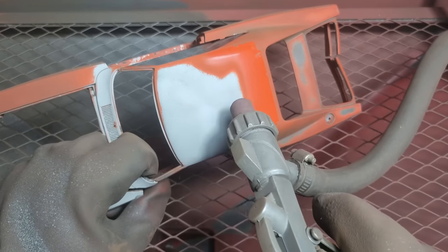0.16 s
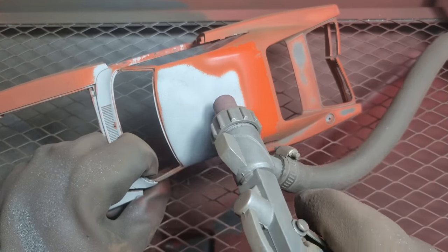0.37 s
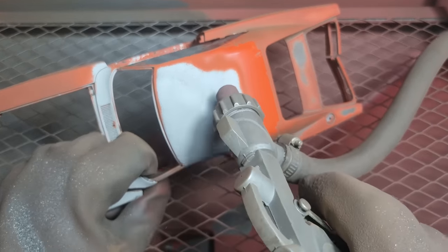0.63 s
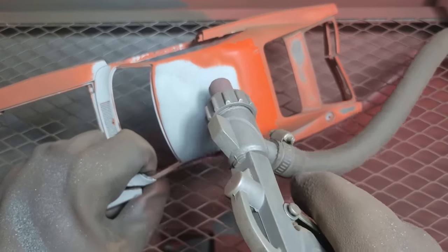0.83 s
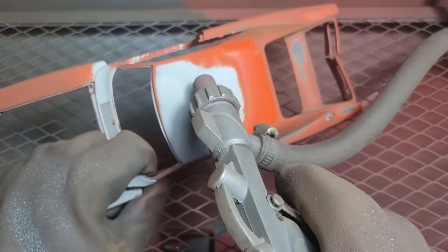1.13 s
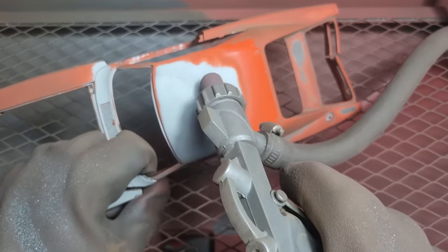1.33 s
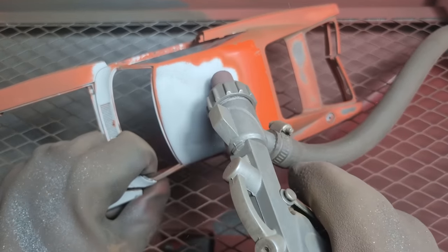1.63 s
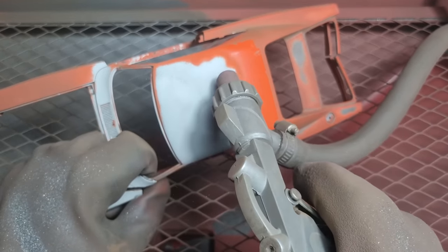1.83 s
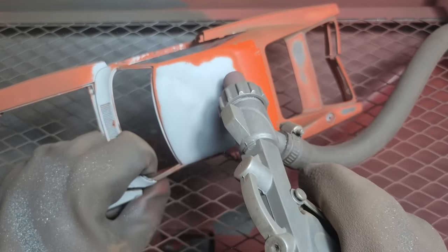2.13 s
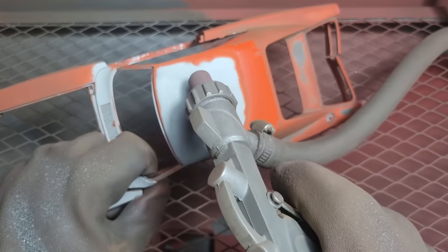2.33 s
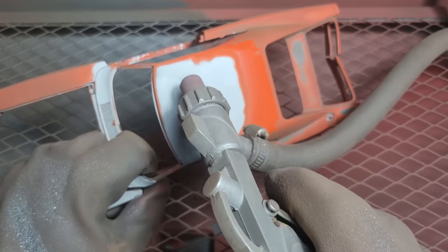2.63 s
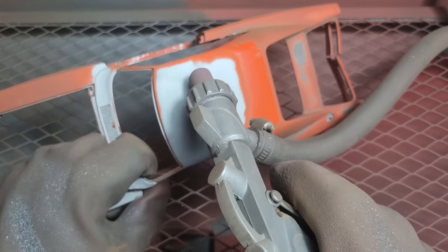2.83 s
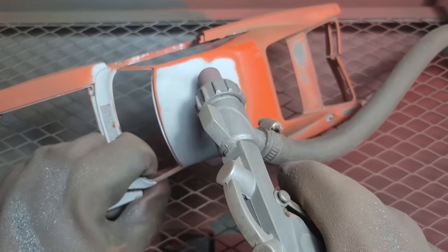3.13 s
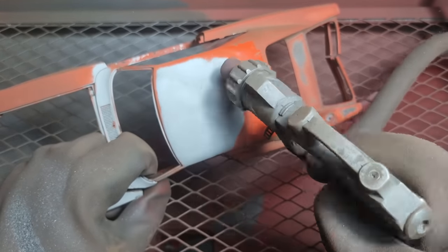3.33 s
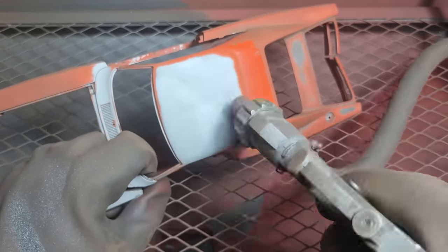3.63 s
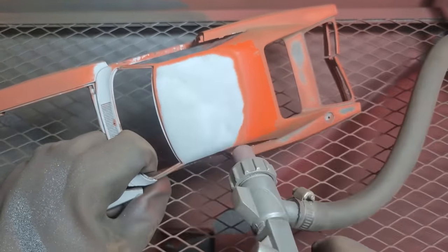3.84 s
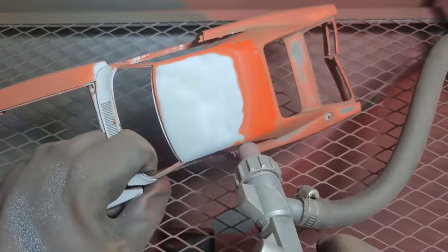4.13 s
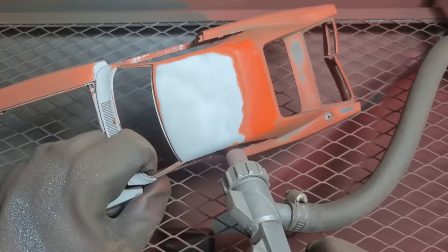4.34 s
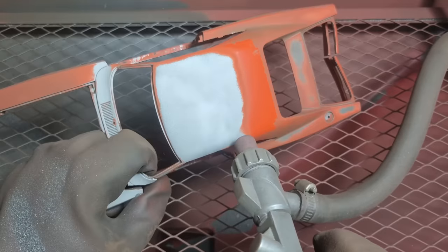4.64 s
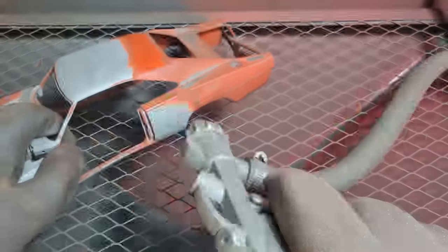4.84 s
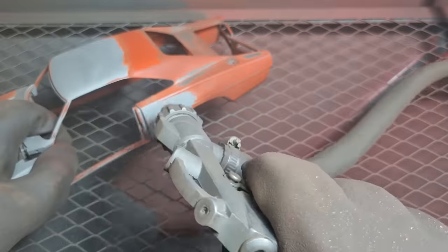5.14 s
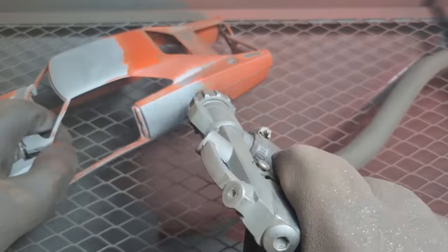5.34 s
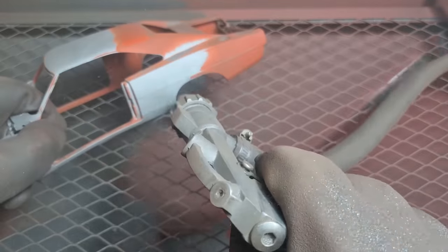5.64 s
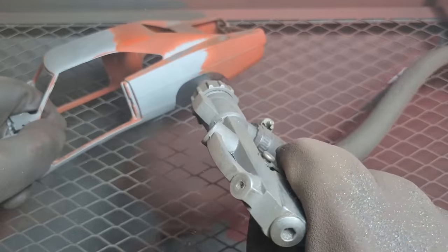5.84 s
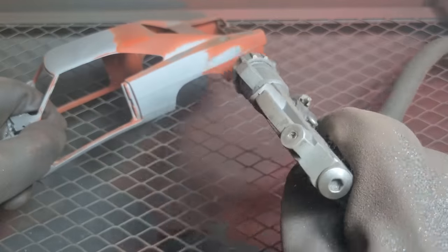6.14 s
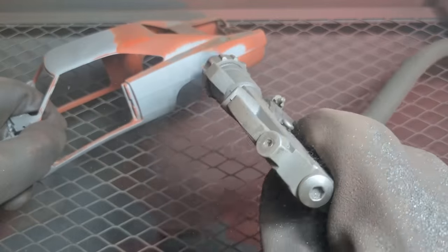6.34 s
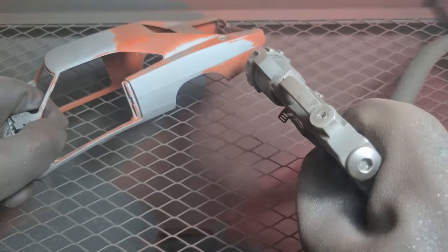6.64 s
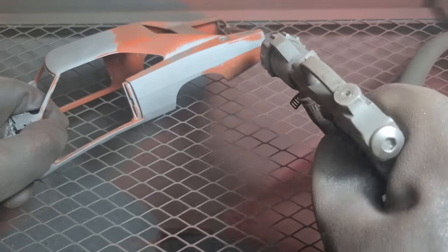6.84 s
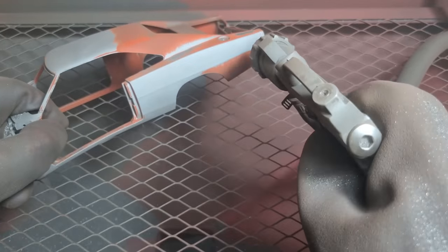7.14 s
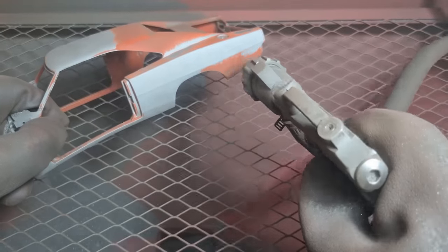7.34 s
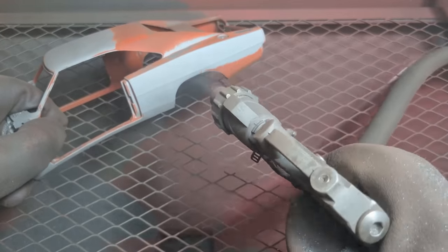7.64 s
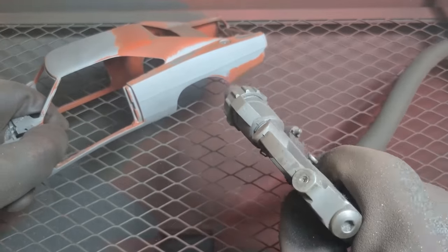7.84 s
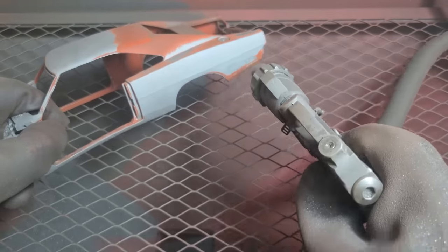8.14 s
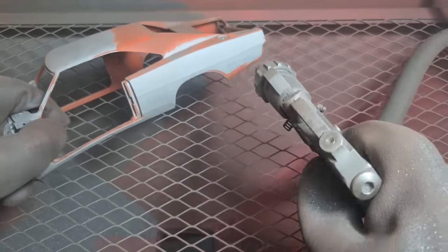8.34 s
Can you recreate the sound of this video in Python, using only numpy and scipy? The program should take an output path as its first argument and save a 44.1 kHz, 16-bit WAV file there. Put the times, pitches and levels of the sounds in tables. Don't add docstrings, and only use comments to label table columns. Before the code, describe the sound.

Steady gritty hiss of a blasting gun on a small metal casting in a steel cabinet, over machine hum; it turns fuller and choppier halfway.

```python
import sys
import numpy as np
from scipy import signal
from scipy.fft import rfft, irfft
from scipy.io import wavfile
from scipy.ndimage import uniform_filter1d

SR = 44100
rng = np.random.default_rng(int(sys.argv[2]) if len(sys.argv) > 2 else 0)


def amplitude_ratio(level_db):
    exponent = np.asarray(level_db, float) / 20
    return 10 ** exponent


def file_out(sig):
    cols = np.atleast_2d(sig).T
    lim = np.clip(cols, -1, 1)
    pcm = np.round(lim * 32767).astype(np.int16)
    wavfile.write(sys.argv[1], SR, pcm)


N = 373968
T, HOP, SIZE = np.arange(N) / SR, 256, 1024

CHANGES = (4.848, 8.252)
# compressor in dB, airflow wash in dB, duct ring in dB.
MACHINES = [
    (-42, -46, -52.5),
    (-98, -46.5, -43.5),
    (-38.5, -43, -49),
]

# roar, splash on the work, jet and grit fizz, all in dB.
BLAST_LAYERS = [
    (-55.5, -50, -50.5, -54),
    (-52, -49, -48, -49.5),
    (-52.5, -47.5, -49, -51),
]
AIM_DRIFT = (-0.43, 0.29, -0.51, -0.55)
# frequency in Hz, density in dB per Hz.
HISS_SPECTRUM = [(700, -27), (1150, -8), (1500, -6), (2100, -4.5), (2700, -5.5), (3900, -5), (5200, -5),
                 (6500, -4.5), (7900, -7.5), (9000, -13.5), (10500, -15.5), (12000, -13), (15000, -12.5),
                 (15700, -11)]
# frequency in Hz, width in Hz, level in dB.
PANELS_EARLY = [(1610, 49, -4), (2010, 200, -4), (2840, 37, -4), (3360, 82, -3), (3750, 29, 0),
                (4030, 54, -1), (4660, 45, 0), (5310, 140, -1), (6510, 110, 0), (7120, 140, -3),
                (7750, 70, -3), (8140, 120, -6)]
# frequency in Hz, width in Hz, level in dB.
PANELS_LATE = [(2010, 110, -3), (2890, 30, -3), (3820, 44, 0), (4290, 48, -2), (4740, 97, -3),
               (5200, 46, -1), (6540, 66, -1), (6780, 54, -3), (7130, 110, -5), (7640, 210, -5),
               (8170, 38, -8), (8790, 42, -10)]
# start in seconds, end in seconds, frequency in Hz, width in Hz, level in dB.
EDGE_WHISTLES = [(1.0, 1.6, 4655, 20, 8), (1.7, 3.4, 4655, 20, 7), (3.6, 4.8, 4030, 40, 0),
                 (5.1, 5.2, 6700, 90, 2), (5.35, 5.5, 7800, 80, 1), (5.97, 6.05, 6600, 90, 2),
                 (6.28, 6.48, 7750, 80, 1), (7.75, 7.95, 4790, 40, 3), (1.35, 2.3, 6500, 90, 2),
                 (7.55, 7.79, 5200, 50, 2), (7.55, 7.79, 3200, 60, 1), (7.9, 8.45, 2900, 30, 4),
                 (7.95, 8.48, 4000, 250, 0)]
# start in seconds, end in seconds, splash in dB, share of it that jet and fizz follow.
JET_SURGES = [
    (4.358, 4.52, 1, 1.3),
    (4.549, 4.8, -1.5, 0.37),
    (4.844, 4.912, -6, 1.5),
    (5.58, 5.72, 1, -0.068),
    (5.814, 5.95, 2.5, -0.29),
    (7.55, 7.792, 4, -.15),
]
# centre in seconds, depth in dB, half width in seconds.
GRIT_GAPS = [
    (4.99, 4, .02),
    (5.215, 7, .012),
    (5.345, 7.5, .013),
    (5.502, 7, .008),
    (5.72, 8.5, .014),
    (5.935, 8, .012),
    (6.118, 7, .01),
    (6.31, 4, .015),
    (6.475, 3, .009),
]

# time in seconds, shaft in Hz, level in dB, left minus right in dB, left's lead in radians.
SHAFT_TRACK = [(0, 534.4, -36.5, -2, 1.2), (.42, 536, -37, 0, 1.26), (2.1, 535.4, -37.5, -.5, 1.4),
               (2.73, 540, -38, -2.5, 1.5), (2.83, 538, -37, 5, .65), (3.8, 534.4, -38, 2.5, 0.64),
               (4.5, 537, -38.5, 5, .52), (4.843, 534, -37.5, 3, 0.31), (4.849, 544.6, -27, 8.5, .55),
               (5.5, 544, -27.5, 10, .68), (5.63, 547, -27, 5, 0.025), (6.6, 546.6, -27, 6.8, -0.22),
               (7.52, 545, -27, 9.5, -0.092), (7.7, 546, -29.5, 4, 0), (7.83, 545.1, -27.5, 8, 0.064),
               (8.238, 545.1, -27.5, 10, .1), (8.262, 538, -37, 4, 0.78), (8.29, 539.3, -32.3, 5.5, 0.85)]
# start in seconds, length in seconds, level in dB.
BLADE_FLARES = [(0, .15, -50), (1.55, 0.71, -53), (4.86, .015, -41), (4.95, .12, -58), (5.602, 0.25, -44.5),
                (5.9, .65, -52), (6.65, .3, -59), (8.03, .06, -53), (8.17, .06, -47), (7.15, .35, -58),
                (8.3, .2, -57)]
# frequency in Hz, density in dB per Hz.
AIR_SPECTRUM = [(20, -26), (54, -9.5), (114, -20.5), (150, -22), (216, -11), (330, -6.5), (420, -7.5),
                (520, -7), (670, -8), (900, -10), (1300, -13.5), (1700, -36)]
# frequency in Hz, width in Hz, level in dB.
DUCT_MODES = [(180, 15, -8), (296, 16, 0), (335, 14, -4), (372, 22, 0), (590, 20, -5), (738, 25, -11),
              (845, 20, -10), (1005, 28, -2)]

# frequency in Hz, width in Hz, level in dB.
BODY_MODES = [(75, 5.5, -13.5), (165, 10, -8), (246.3, 14.3, -9), (324, 17.6, -7), (393.8, 14.5, -4.5),
              (494, 23, -21), (620, 22, -32), (724.6, 13.4, -8), (945, 14, -17.5), (1004, 21, -14),
              (1126, 16, -23.5), (1280, 20, -19)]
# frequency in Hz, level in dB.
PIPE_TONES = [
    (247.5, -11.5),
    (398, -7.5),
]

# start in seconds, length in seconds, start pitch in Hz, rise ratio, level in dB.
GLOVE_GROANS = [
    (0.221, .15, 47.7, 1.2, -52.5),
    (1.202, .11, 71.5, 1.07, -54),
    (5.07, .13, 75, 1.34, -52),
    (5.441, .08, 112, 1.1, -58),
    (5.52, 0.15, 115, 1.16, -55.5),
    (5.599, .174, 64.6, 1.41, -46.5),
    (5.87, .1, 105, 1.2, -55.5),
    (6.03, .09, 66, 1.3, -62),
    (6.158, 0.094, 76.5, 1.05, -57),
    (7.02, 0.11, 44.6, 1.4, -57),
]

# frequency in Hz, coherence from 0 to 1.
COHERENCE = [(60, 0.9), (130, 0.82), (290, 0.95), (640, 0.18), (1410, 0.2), (3100, 0.75), (6820, 0.48),
             (15000, 0.65)]
# frequency in Hz, left's lead in radians.
SIDE_PHASE = [(20, 0), (400, .25), (860, 2.4), (1400, 1.5), (2100, -.2), (15000, 0)]
# frequency in Hz, left minus right in dB.
SIDE_BALANCE = [(60, .3), (110, 0.0), (200, -2.5), (380, 2.0), (700, 1.0), (1290, -1.0), (2380, 2.5),
                (4400, 7), (8120, 2.5), (15000, -0.5)]


def evened(x):
    return x / np.sqrt(np.mean(abs(x) ** 2) + 1e-20)


def unit(shape):
    return shape / np.sqrt(np.sum(shape ** 2))


def read(points, hz):
    f, value = np.transpose(points)
    return np.interp(np.log(hz + 1), np.log(f + 1), value)


def by_view(table, t):
    return np.transpose(table)[:, np.searchsorted(CHANGES, t)]


def drift(hz, count):
    f = np.geomspace(.2, hz, count)[:, None]
    t = T[::HOP]
    waves = np.sin(2 * np.pi * (f * t + rng.random((count, 1)))) / np.sqrt(f)
    return np.interp(T, t, evened(waves.sum(0)))


def phase_of(hz):
    return 2 * np.pi * np.cumsum(hz) / SR


def resonances(modes, hz):
    return np.sqrt(sum(amplitude_ratio(db) ** 2 / (1 + (2 * (hz - f) / width) ** 2) for f, width, db in modes))


def grid(size):
    return np.fft.rfftfreq(size, 1 / SR)[:, None], np.arange(4 * N // size + 4) * size / 4 / SR


def diffuse_noise(magnitude, size):
    hz = grid(size)[0]
    a, b, c, d = rng.standard_normal((4,) + magnitude.shape)
    same = np.clip(read(COHERENCE, hz), 0, 1)
    left = a + 1j * b
    right = same * left + np.sqrt(1 - same ** 2) * (c + 1j * d)
    right = right * np.exp(-1j * read(SIDE_PHASE, hz))
    lean = amplitude_ratio(read(SIDE_BALANCE, hz) / 2)
    z = np.array([left * lean, right / lean]) * magnitude
    return signal.istft(z, nperseg=size, noverlap=size * 3 // 4)[1][:, :N]


def cabinet(size):
    places, decay_s, direct, diffuse = 9, 0.12, 0.61, 0.51
    out = np.zeros((2, N + size))
    span = N // (places - 1) + 1
    t = np.arange(size) / SR
    for k in range(places):
        at = np.arange(max(k - 1, 0) * span, min((k + 1) * span, N))
        hiss = rng.standard_normal(len(at)) * np.cos(np.pi / 2 * (at / span - k))
        fine = rfft(rng.standard_normal((2, size)) * amplitude_ratio(-60 * t / decay_s))
        broad = np.sqrt(uniform_filter1d(abs(fine) ** 2, size=28))
        echoes = irfft(fine / broad, size)
        echoes[:, :2] = direct * np.array([1, -.5])
        out[:, at[0]:at[-1] + size] += signal.oaconvolve(hiss[None], echoes, axes=1)
    return out[:, :N] + diffuse * rng.standard_normal((2, N))


def blast():
    hz, t, z = signal.stft(cabinet(size=4096), SR, nperseg=SIZE, noverlap=SIZE - HOP)
    hz = hz[:, None]
    turned_s = np.where(t < CHANGES[1], np.maximum(t - CHANGES[0], 0), 0)
    layers_db = []
    for layer_db, slope in zip(by_view(BLAST_LAYERS, t), AIM_DRIFT):
        unsteady_hand_db = .35 * np.interp(t, T, drift(6, count=20))
        layer_db = layer_db + slope * turned_s + unsteady_hand_db
        layers_db.append(layer_db - layer_db.mean())
    layers_db = np.array(layers_db)
    for start, end, db, share in JET_SURGES:
        layers_db += np.outer([0, 1, share, share], db * (t > start) * (t < end))

    knots = np.log([2200, 2750, 5250, 5700, 8300, 9500])
    weights = [np.interp(np.log(hz + 1), knots, w) for w in np.eye(4)[[0, 1, 1, 2, 2, 3]].T]
    level_db = sum(w * layer_db for w, layer_db in zip(weights, layers_db))
    gap_db = 0
    for s, db, half in GRIT_GAPS:
        half = half * np.where(t > s, 1.6, .8)
        gap_db = gap_db + db * np.exp(-((t - s) / half) ** 2)
    level_db = level_db - gap_db * np.interp(hz, [2000, 7000], [.1, .85])
    gust = evened(uniform_filter1d(rng.standard_normal(len(t)), 6))

    ring = np.where(t < 4.85, resonances(PANELS_EARLY, hz), resonances(PANELS_LATE, hz))
    for start, end, f, width, db in EDGE_WHISTLES:
        ring = np.hypot(ring, resonances([(f, width, db)], hz) * (t > start) * (t < end))
    shape = np.hypot(amplitude_ratio(read(HISS_SPECTRUM, hz)), amplitude_ratio(-1.5) * ring) * (hz > 900)
    lean = amplitude_ratio(read(SIDE_BALANCE, hz) * np.array([.5, -.5])[:, None, None])
    z = z * shape * lean * amplitude_ratio(level_db + 0.31 * gust)
    return amplitude_ratio(-40.5) * evened(signal.istft(z, nperseg=SIZE, noverlap=SIZE - HOP)[1][:, :N])


def extractor():
    blades, blur_hz, resting_db, flare_edge_s = 7, 38, -62, 0.045
    s, *columns = np.transpose(SHAFT_TRACK)
    hz, db, pan_db, lead = [np.interp(T, s, c) for c in columns]
    turn = phase_of(hz)
    pair = np.array([amplitude_ratio(pan_db / 2) * np.exp(1j * lead), amplitude_ratio(-pan_db / 2)])
    pair /= abs(pair.mean(0))
    flutter = amplitude_ratio(.3 * drift(14, count=24))
    shaft = np.sqrt(2) * amplitude_ratio(db) * flutter * (pair * np.exp(1j * turn)).real

    r = np.exp(-np.pi * blur_hz / SR)
    white = rng.standard_normal(N) + 1j * rng.standard_normal(N)
    blur = evened(signal.lfilter([1], [1, -2 * r, r * r], white))
    blade_level = amplitude_ratio(resting_db)
    for s, length, db in BLADE_FLARES:
        edge = np.minimum(4 * (T - s), s + length - T) / flare_edge_s
        blade_level = blade_level + amplitude_ratio(db) * np.clip(edge + 1, 0, 1)
    blade = (blur * np.exp(1j * blades * turn)).real * blade_level
    return shaft + blade * amplitude_ratio(np.array([[-9], [0]]))


def airflow():
    hz, t = grid(size=4096)
    _, wash_db, ring_db = by_view(MACHINES, t)
    wash = unit(amplitude_ratio(read(AIR_SPECTRUM, hz))) * amplitude_ratio(wash_db)
    ring = unit(resonances(DUCT_MODES, hz)) * amplitude_ratio(ring_db)
    return diffuse_noise(np.hypot(wash, ring), size=4096) * 0.87


def compressor():
    stroke_hz, casing_hz, casing_db, throb_depth = 11.55, 174.9, -4.5, 0.43
    hz, t = grid(size=8192)
    spot_db = 10.0 * np.exp(-((hz - 1060) / 110) ** 2)
    spot_db = spot_db + 4 * np.exp(-((hz - 400) / 40) ** 2)
    spot_db = spot_db - 4.4 * np.exp(-((hz - 720) / 80) ** 2)
    near = amplitude_ratio((t > 8) * spot_db)
    body = diffuse_noise(unit(resonances(BODY_MODES, hz)) * near, size=8192)

    throb = 1 + throb_depth * np.cos(2 * np.pi * (stroke_hz * T + 0.64))
    phase = phase_of(casing_hz + 0.89 * drift(3.89, count=16))
    drone = amplitude_ratio(casing_db + 0.5 * drift(4.8, count=12)) * throb * np.cos(phase)
    drone = drone * amplitude_ratio(np.array([[-1.5], [1.5]]))
    for f, db in PIPE_TONES:
        pipe_level = amplitude_ratio(db + 2 * drift(4, count=12))
        drone = drone + pipe_level * np.cos(phase_of(f + 3 * drift(8, count=16)))

    level = amplitude_ratio(by_view(MACHINES, T - 0.0072 * (T > 8))[0])
    level = uniform_filter1d(level, size=900) * amplitude_ratio(-0.2 * drift(6, count=16))
    return evened(evened(body) + drone * np.sqrt(2)) * level


def gloves():
    creak_s, creak_db, overtone_db = 5.07, 2, -14
    out = np.zeros(N)
    for s, length, start_hz, rise, db in GLOVE_GROANS:
        turn = phase_of(start_hz * np.linspace(1, rise, int(length * SR)))
        over_db = creak_db if abs(s - creak_s) < .05 else overtone_db
        tone = np.sin(turn) + amplitude_ratio(over_db) * (np.sin(2 * turn) + 0.46 * np.sin(3 * turn))
        out[int(s * SR):][:len(turn)] += 2 * amplitude_ratio(db) * tone * np.hanning(len(turn))
    return out


def first_change():
    fade_s, drop_s, ramp_s, overshoot_s = 4.81, .007, .033, .027
    tail_db, return_db, overshoot_db = -13, -24, 2.3
    back = CHANGES[0] + drop_s / 2
    full = CHANGES[0] + ramp_s
    settling = full + overshoot_s
    at = [fade_s, fade_s + drop_s, CHANGES[0] - drop_s, back, full, settling, settling + drop_s]
    gain_db = [0, tail_db, tail_db, return_db, overshoot_db, overshoot_db, 0]
    return np.interp(T, at, amplitude_ratio(gain_db))


def scene():
    return blast() + extractor() + airflow() + compressor() + gloves()


def roll_off(x):
    return signal.sosfilt(signal.butter(12, 16950, fs=SR, output="sos"), x)


def record(dry):
    spectrum = rfft(dry * first_change())
    limited = irfft(spectrum * (np.fft.rfftfreq(N, 1 / SR) < 15730), N)
    return roll_off(limited)


dry = scene()
out = record(dry)
file_out(out)
```